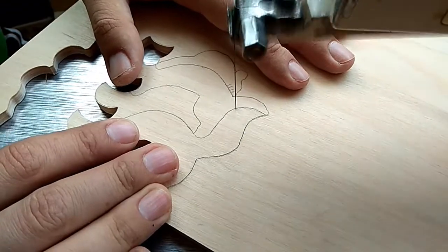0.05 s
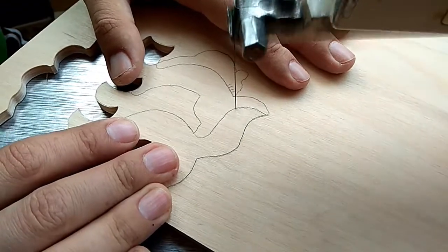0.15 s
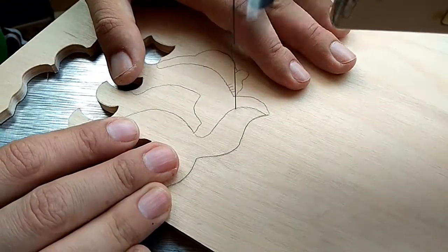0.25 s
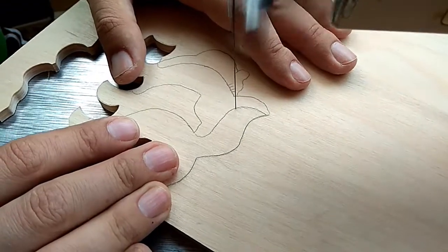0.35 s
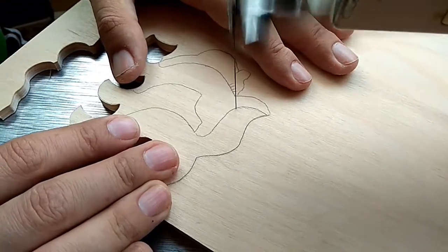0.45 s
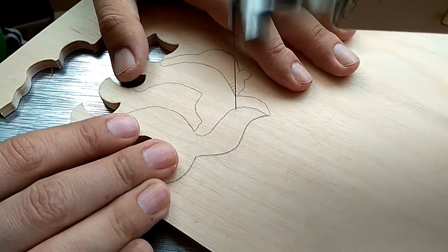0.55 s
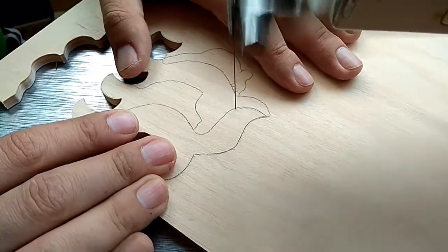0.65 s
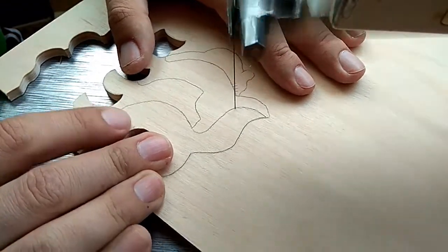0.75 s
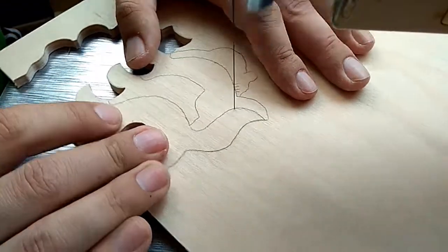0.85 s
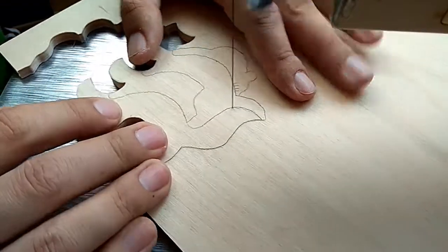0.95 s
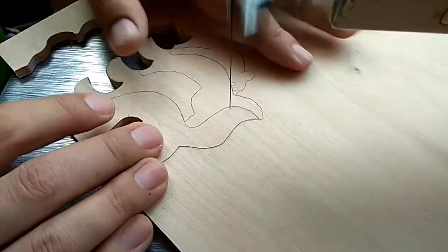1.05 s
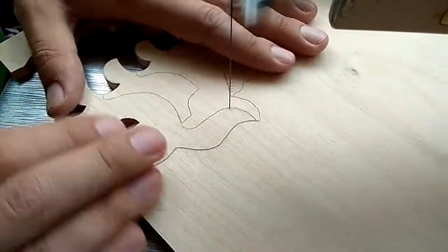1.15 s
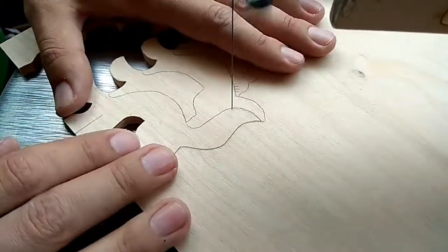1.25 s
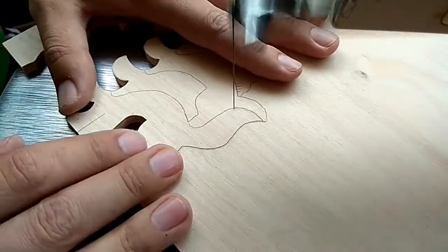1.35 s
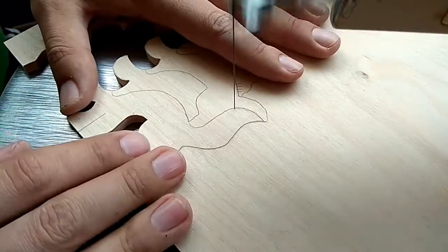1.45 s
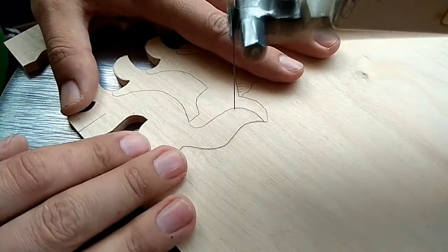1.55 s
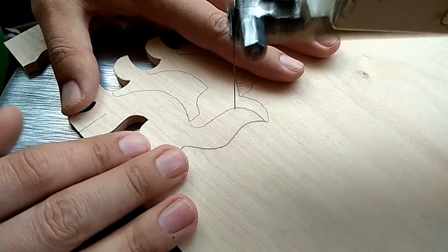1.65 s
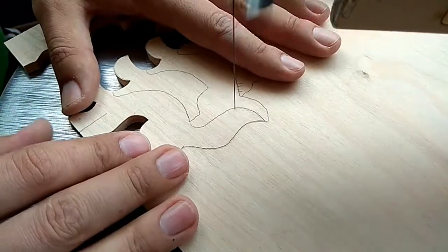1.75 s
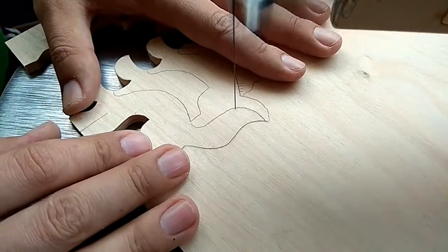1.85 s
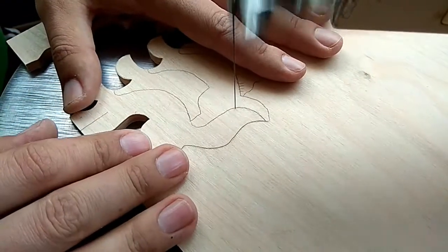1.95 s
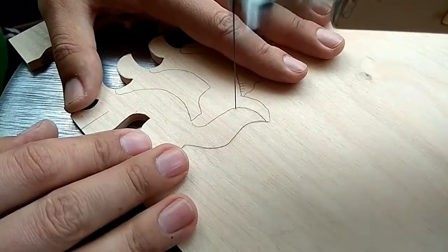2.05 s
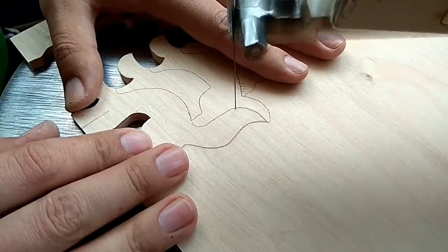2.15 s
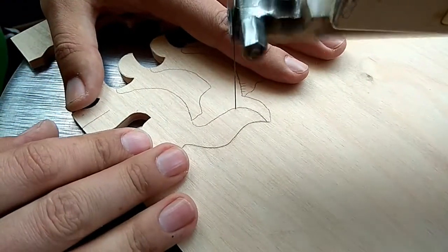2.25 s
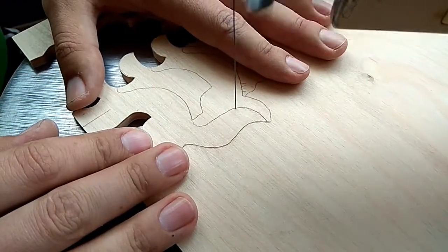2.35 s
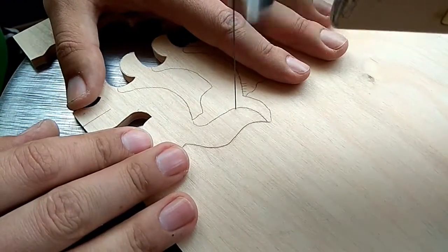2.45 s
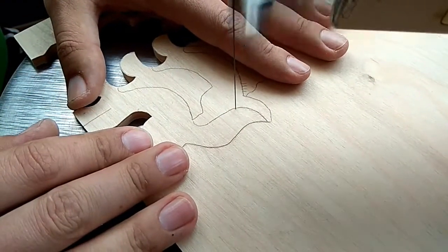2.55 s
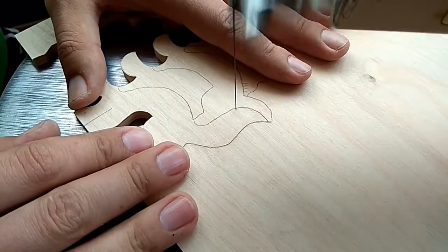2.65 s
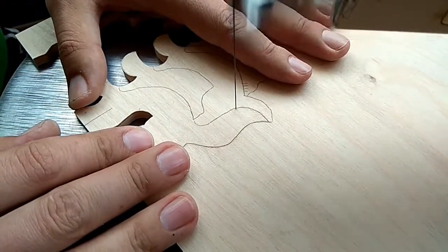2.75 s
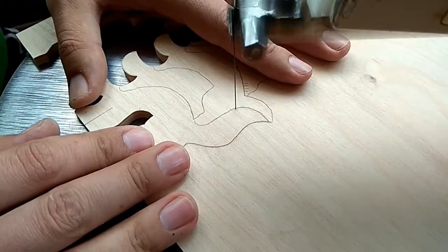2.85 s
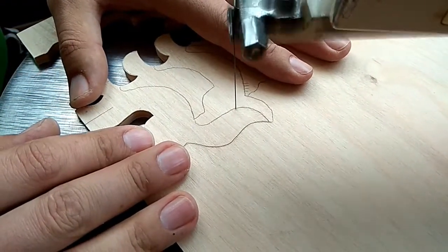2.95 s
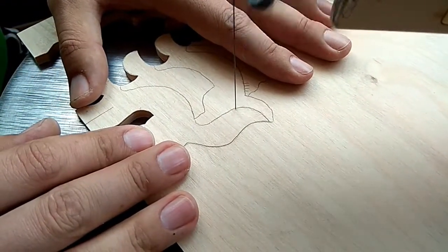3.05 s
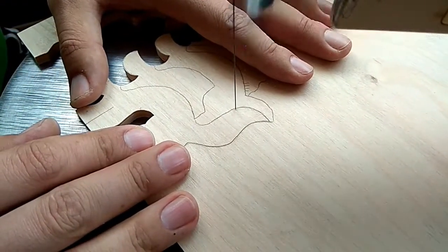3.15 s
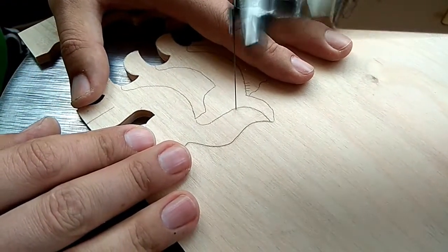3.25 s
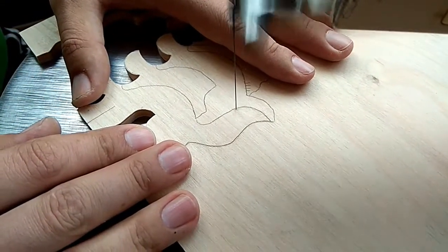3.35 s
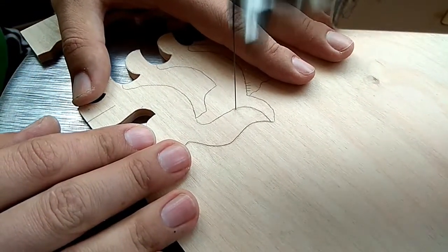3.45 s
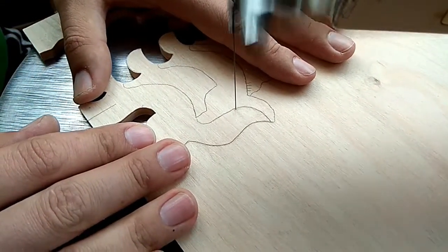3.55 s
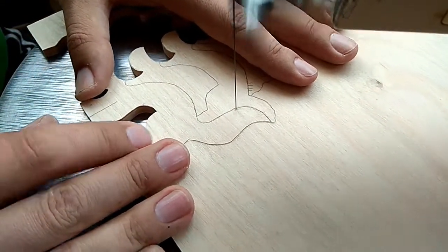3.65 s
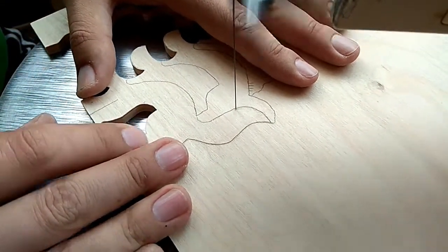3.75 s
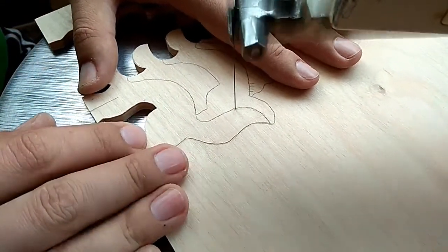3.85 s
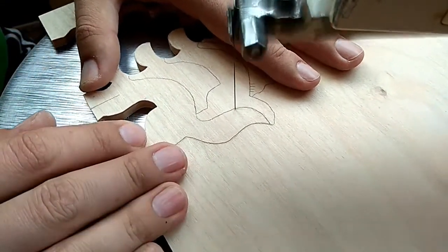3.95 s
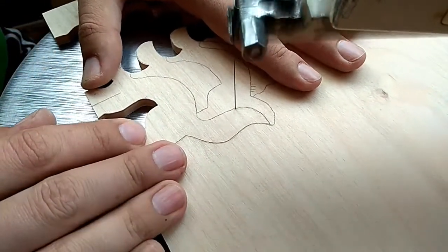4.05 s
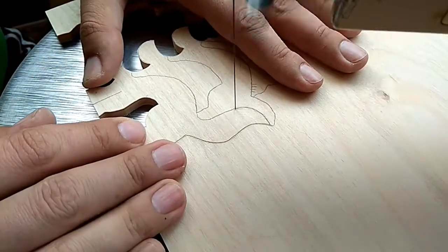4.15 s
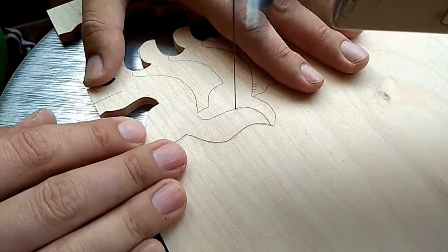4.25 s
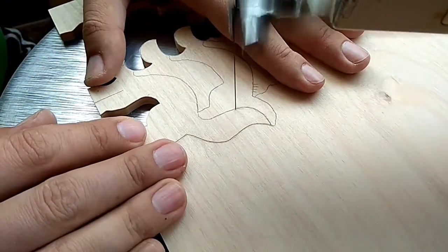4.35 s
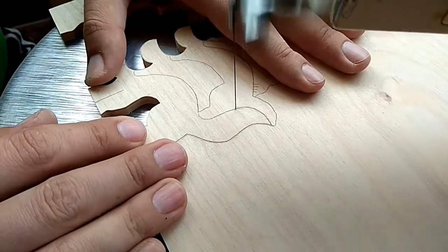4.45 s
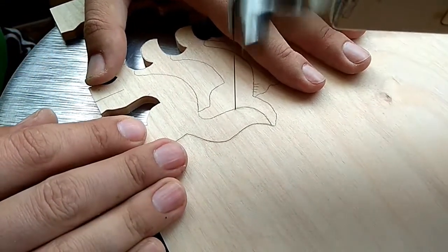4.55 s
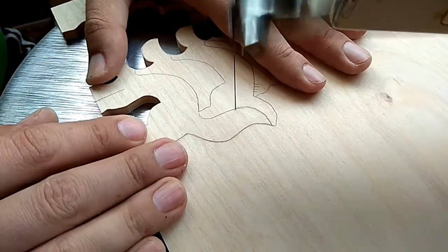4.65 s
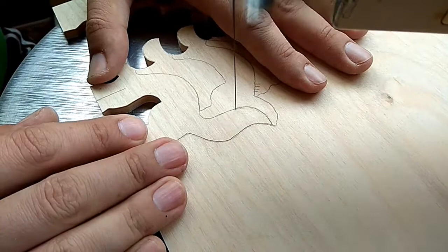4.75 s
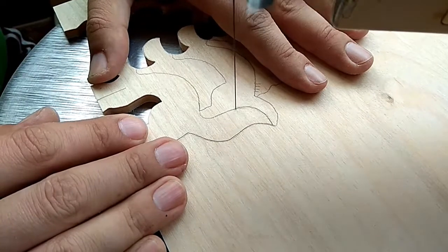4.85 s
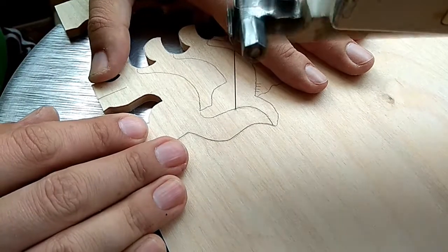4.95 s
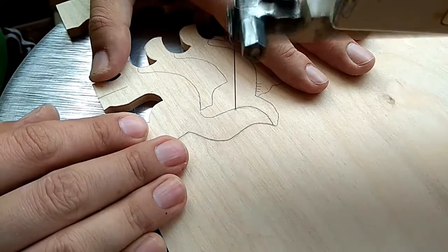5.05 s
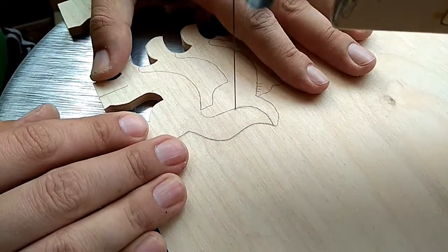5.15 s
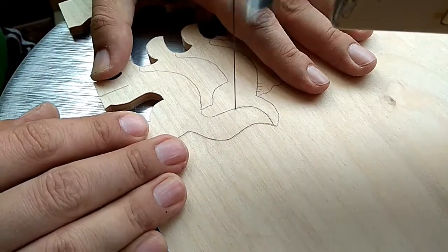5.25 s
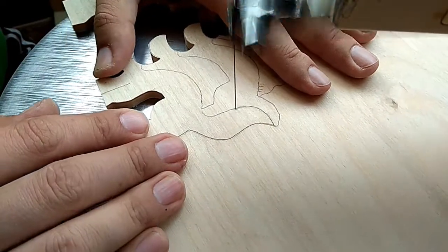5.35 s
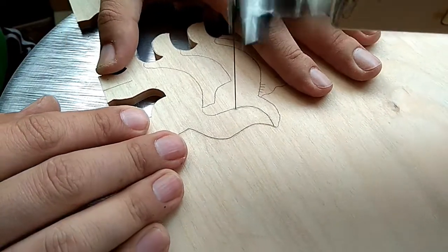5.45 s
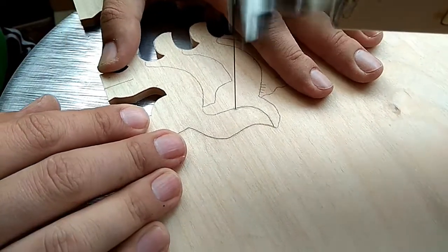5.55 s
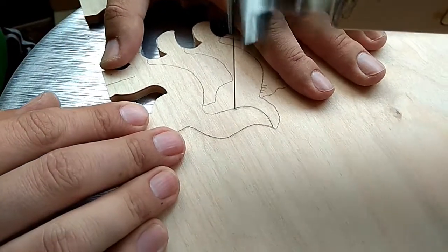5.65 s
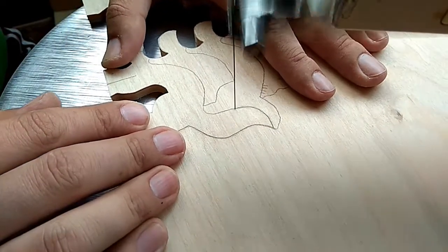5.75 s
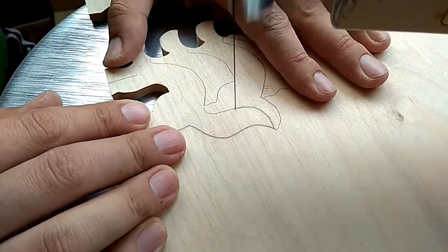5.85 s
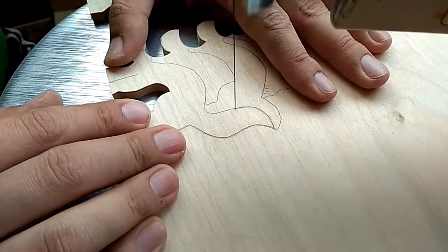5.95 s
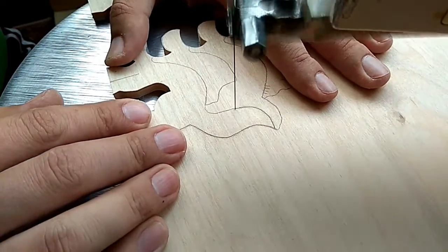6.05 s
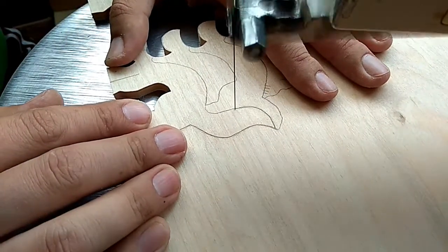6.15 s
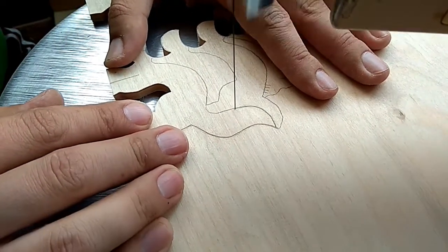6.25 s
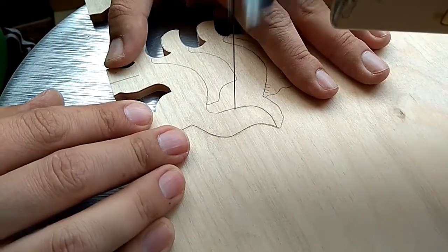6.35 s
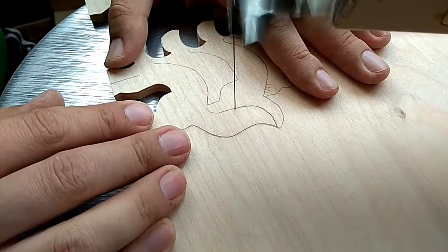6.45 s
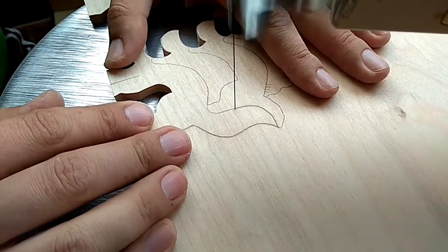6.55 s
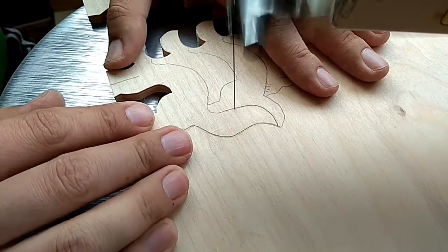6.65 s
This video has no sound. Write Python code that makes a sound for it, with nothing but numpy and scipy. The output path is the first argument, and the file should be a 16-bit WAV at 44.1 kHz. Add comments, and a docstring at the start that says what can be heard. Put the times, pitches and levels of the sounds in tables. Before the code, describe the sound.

Close, rattling scroll saw cutting a thin board: rapid woody knocks, gritty tooth rasp and low motor hum, with one short early lull.

```python
"""In a workshop a scroll saw cuts thin plywood, close to two microphones, over motor rumble and hum.
A crank drives the blade up and down about 23 times a second. On each downstroke the teeth catch with a knock,
rattle as clicks whose rate arches with blade speed, and ring the board; coloured noise rubs both ways.
Early on the feed eases off for a moment, the motor runs faster, and the blade sings out a few times."""
import sys
import numpy as np
from scipy import signal
from scipy.fft import rfft, irfft
from scipy.io import wavfile
from scipy.ndimage import uniform_filter1d

SR = 44100
rng = np.random.default_rng(int(sys.argv[2]) if len(sys.argv) > 2 else 0)


def voltage_ratio(level):
    """Linear amplitude factor for a level in decibels (scalar or array-like)."""
    return 10 ** (np.asarray(level, float) / 20)


def waveform_to_disk(signal):
    """Save audio, clipped to [-1, 1], as 16-bit WAV at the path in sys.argv[1]."""
    frames = np.transpose(np.atleast_2d(signal))
    scaled = np.clip(frames, -1, 1) * 32767
    samples = np.round(scaled).astype(np.int16)
    wavfile.write(sys.argv[1], SR, samples)


N = 295470


def evened(x):
    """Scales to rms 1."""
    return x / np.sqrt(np.mean(x ** 2) + 1e-20)


def read(points, hz):
    """Interpolates a spectrum on a log-frequency axis."""
    f, value = np.transpose(points)
    return np.interp(np.log(hz + 1), np.log(f + 1), value)


def curves(rows):
    """Columns of a timed table, one value a sample."""
    s, *columns = np.transpose(rows)
    return [np.interp(np.arange(N) / SR, s, c) for c in columns]


def mode(x, hz, width_hz):
    """One-pole complex resonance, about unit gain at its centre, along the last axis."""
    r = np.exp(-np.pi * width_hz / SR)
    pole = r * np.exp(2j * np.pi * hz / SR)
    return 2 * signal.lfilter([1 - r], [1, -pole], x).real


def drift(size):
    """Smoothed noise of rms 1; size in samples."""
    return evened(uniform_filter1d(rng.standard_normal(N), size=size))


def noise(spectrum_db, size, patchy_db):
    """Two unrelated noises of joint rms 1, coloured by spectrum_db(Hz, s) and shared drifting patches."""
    hz, frames = np.fft.rfftfreq(size, 1 / SR), 4 * N // size + 5
    a, b, patches = rng.standard_normal((frames, len(hz), 2, 3)).T
    patches = uniform_filter1d(patches[0], size=6, axis=0)
    patches = evened(uniform_filter1d(patches, size=30, axis=1))
    frame_s = np.arange(frames) * size / 4 / SR
    z = (a + 1j * b) * voltage_ratio(spectrum_db(hz[:, None], frame_s) + patchy_db * patches)
    return evened(signal.istft(z, nperseg=size, noverlap=3 * size // 4)[1][:, :N])


# motor: t/s, relative rumble level/dB, relative hum level/dB
MOTOR_LEVELS = [(0, -43.5, -37), (0.4, -48.5, -43.5), (0.75, -57, -49), (1, -50, -42), (1.35, -46.5, -43.5),
                (1.68, -57, -54), (1.95, -47, -53), (2.15, -45.5, -51.5), (2.4, -51.5, -43),
                (3.0, -45, -44.5), (3.4, -43, -44), (3.6, -45.5, -43), (4.3, -44, -43), (4.55, -48.5, -45),
                (5, -44.5, -42), (5.8, -44.5, -45), (6.4, -41.5, -47), (6.7, -44.5, -39)]
# rumble spectrum: f/Hz, relative level/dB
RUMBLE_SPECTRUM = [(12, -34), (20, -0.5), (107, -6), (150, -3), (268, -8), (300, -4.5), (390, -92),
                   (660, -120)]
HUM_HZ = 300


def motor():
    """Lumpy low noise, unlike at the two microphones, plus a shared sine hum with a narrowband waver."""
    rumble_db, hum_db = curves(MOTOR_LEVELS)
    rumble = noise(lambda hz, s: read(RUMBLE_SPECTRUM, hz) + 0 * s, size=2048, patchy_db=1.0)
    dips_db = 6.0 - 3.0 * np.minimum(drift(3500) ** 2, 5)  # level wavers at random, with brief deep dips
    rumble = rumble * voltage_ratio(rumble_db + 5.0) * voltage_ratio(dips_db)
    waver = evened(mode(rng.standard_normal(N), HUM_HZ, 8.6))
    hum = np.sin(2 * np.pi * HUM_HZ * np.arange(N) / SR) + .9 * waver
    return rumble + voltage_ratio(hum_db - 2.5) * hum


# blade rings: t/s, peak level before the saw's filters/dB, f/Hz
CLINK_ROWS = [(0.2199, -8, 6120), (0.2684, -20, 6030), (0.3127, -12, 6250), (0.3341, -17, 6080),
              (0.354, -7, 6110), (0.3945, -12, 6070), (0.4, -14, 6260)]
CLINK_S = 0.0012  # onset to envelope peak


def clinks():
    """Short sine rings of the taut blade near 6 kHz, each with a rise-and-decay envelope."""
    t, out = np.arange(N) / SR, np.zeros(N)
    for s, db, hz in CLINK_ROWS:
        u = np.maximum(t - s, 0) / CLINK_S
        out += voltage_ratio(db) * u * np.exp(1 - u) * np.sin(2 * np.pi * hz * t)
    return out


# crank: t/s, turns completed/turns; faster while the feed eases off
CRANK_TURNS = [(-.0015, 0), (.4349, 10), (.9791, 23), (1.2797, 30), (2.1888, 51), (2.9711, 69),
               (3.3677, 78), (3.8908, 90), (5.2068, 120), (5.9946, 138), (6.3867, 147), (6.7372, 155)]


def crank():
    """Crank turns since the first catch."""
    return np.interp(np.arange(N) / SR, *np.transpose(CRANK_TURNS))


# rubbing spectra, early and late colour: f/Hz, relative level/dB
EARLY_RUB = [(180, -83), (300, -24), (420, -13.5), (563, -21.5), (738, 3.5), (883, -22), (1140, -11.5),
             (1930, -2.5), (2450, -7), (3900, -10.5), (4530, -15.5), (5420, -4), (6200, 1), (7310, -2.5),
             (9440, -25.5), (10800, -32.5), (14000, -120), (22000, -120)]
LATE_RUB = [(180, -72), (300, -21.5), (547, -12.5), (749, -6), (883, -6), (1280, -2), (1900, -10.5),
            (2310, -11.5), (3070, -12), (3950, -11.5), (4330, -5), (6580, -26), (7200, -24), (10000, -5),
            (10800, -4), (14000, -100), (22000, -120)]
# modes the rubbing rings: f/Hz, width/Hz, level re rubbing/dB
RUB_MODES = [(3030, 94, -1), (3507, 54, -1), (3900, 110, -7.5), (6210, 71, -4)]
# hollow as the work is turned: t/s, centre f/Hz, gain/dB, share of the late rubbing colour/0-1
WORK_HOLLOW = [(0, 5400, -8, 0.35), (.6, 4920, -12, 0.5), (2, 4710, -14, 0.49), (3.2, 4920, -5, 0.51),
               (3.7, 4750, 2, 0.55), (5.8, 4330, -3, 0.7), (6.7, 4630, -7, 0.67)]
LULL_TURN, LULL_SPAN_TURN, LULL_DB, LULL_HZ = 0.73, 0.093, -4, 1530
HEAVE_TURN, HEAVE_SPAN_TURN, HEAVE_DB, HEAVE_HZ = 0.37, .12, 7, 590


def rubbing(part, speed, clicks, rub_db, low_db):
    """Noise that swells with blade speed, is puffed by the teeth and rings the frame and work."""
    late_share = curves(WORK_HOLLOW)[2]

    def colour_db(hz, s):
        """Blends the two colours and shifts the part under about 2.3 kHz."""
        low = np.interp(s * SR, np.arange(N), low_db) - 3.0
        share = np.interp(s * SR, np.arange(N), late_share)
        blend = (1 - share) * read(EARLY_RUB, hz) + share * read(LATE_RUB, hz)
        return blend + low / (1 + (hz / 2300) ** 6)

    swell = 0.57 + (0.58 + 0.03 * np.sign(speed)) * abs(speed) ** 0.34
    hiss = voltage_ratio(rub_db + 4.5) * swell * noise(colour_db, size=512, patchy_db=2.5)
    hiss = hiss * (0.77 + 0.1 * uniform_filter1d(clicks, size=9) * 9 / 4)  # each tooth tears a puff of fibres
    hiss = hiss + voltage_ratio(4) * mode(hiss, 390, 13.5) + voltage_ratio(-1) * mode(hiss, 495, 18.7)  # the frame hums along
    hiss = hiss + sum(voltage_ratio(db) * mode(hiss, hz, width_hz) for hz, width_hz, db in RUB_MODES)
    # lull: mid upstroke, board hardly driven; heave: late downstroke, table pushed down and thuds
    for turn, span, db, hz in ((LULL_TURN, LULL_SPAN_TURN, LULL_DB, LULL_HZ),
                               (HEAVE_TURN, HEAVE_SPAN_TURN, HEAVE_DB, HEAVE_HZ)):
        low = signal.sosfiltfilt(signal.butter(3, hz, fs=SR, output="sos"), hiss)
        hiss = hiss + low * (voltage_ratio(db * np.exp(-((part - turn) / span) ** 2)) - 1)
    return hiss


TOP_TEETH_HZ = 1991.4  # mean tooth rate at full blade speed


def teeth(speed, jitter_teeth, uneven_db):
    """One click per passing tooth, sized separately for two paths; grain makes spacing and size uneven."""
    slip = .4 * drift(1500)  # teeth, slow
    passed = np.floor(np.cumsum(TOP_TEETH_HZ * abs(speed)) / SR + jitter_teeth * drift(40) + slip)
    clicks = np.diff(np.maximum.accumulate(passed), prepend=0) > 0
    size = np.clip(rng.standard_normal((N, 2)).T, -2, 1.5)
    return evened(clicks * voltage_ratio(uneven_db * size))


# board and table response to a tooth blow: f/Hz, gain/dB
BOARD_GAIN = [(100, -29), (350, -39), (600, -20), (1000, 8), (2000, 0), (2500, -16), (3800, -2.5),
              (4300, -16), (4750, -7.5), (5300, 0.5), (6000, -0.5), (11000, -37)]
# narrow modes of board and frame: f/Hz, width/Hz, level re plain response/dB
BOARD_MODES = [(670, 117, 19), (963, 9.8, 19), (1045.6, 16, 15.5), (1431, 17, 11.5), (1607, 65, 8.5),
               (2070, 44, 17.5), (1272.4, 30, 13), (1500, 11, 16), (1891, 81, 12.5), (3175, 86, 17),
               (3580, 47, 4.5), (3877, 29, 16.5)]


def radiate(x, size=4096):
    """Causal minimum-phase colour of the board, plus its narrow modes, weaker on the second path."""
    log_gain = np.log(voltage_ratio(read(BOARD_GAIN, abs(np.fft.fftfreq(size, 1 / SR)))))
    taps = np.fft.ifft(np.exp(np.conj(signal.hilbert(log_gain)))).real[:size // 2]
    plain = signal.oaconvolve(x, taps[None], axes=1)[:, :N]
    rings = sum(voltage_ratio(db) * mode(plain, hz, width_hz) * [[1], [.6]] for hz, width_hz, db in BOARD_MODES)
    return plain + rings


# lower hollow, moving as hands and work shift: t/s, centre f/Hz, gain/dB
HANDS_HOLLOW = [(0, 2370, -2), (.5, 2340, -4), (.64, 2350, -1), (.7, 1320, -14), (.78, 1460, -19),
                (.84, 1400, -23), (.9, 1150, -7), (.95, 1350, -18), (1.03, 1370, -1), (1.1, 2640, -4.5),
                (3.3, 2430, 2), (3.6, 2420, -6.5), (4.85, 2350, -1.5), (5.05, 2700, -3), (5.4, 2590, -7),
                (5.6, 2890, -9), (6.7, 2700, -1.5)]


def hollowed(x, size=512):
    """Two drifting Gaussian hollows in the spectrum of the whole saw."""
    hz, s, z = signal.stft(x, SR, nperseg=size, noverlap=3 * size // 4)
    at = np.minimum(s * SR, N - 1).astype(int)
    for rows, width_hz in ((WORK_HOLLOW, 330), (HANDS_HOLLOW, 170)):
        centre_hz, gain_db = (c[at] for c in curves(rows)[:2])
        z = z * voltage_ratio(gain_db * np.exp(-((hz[:, None] - centre_hz) / width_hz) ** 2))
    return signal.istft(z, SR, nperseg=size, noverlap=3 * size // 4)[1][:, :N]


# clearest catches: t/s, relative knock level/dB, relative board ring level/dB, cut level re feed/dB
HARD_CATCHES = [(.22, -11, -23.5, -15), (.395, -16, -27, 5), (.565, -19, -34, 5.5), (.693, -27, -38.5, 9),
                (.77, -32, -54, 5), (.814, -27, -41, -6), (.858, -31, -45, -5), (.94, -28, -45, 7),
                (1.454, -7, -23, 2), (1.496, -9, -20, 1), (1.67, -11, -27, 3.5), (1.756, -1, -25, 4.5),
                (1.886, 1, -28, 0.5), (2.016, -17, -20, 1), (2.059, -3, -22.5, -1), (2.233, -8, -24, 1),
                (2.32, -5, -20.5, 2), (2.364, -11, -21, 4), (2.493, -12, -29, 3), (2.623, -3, -25, 3),
                (2.883, -6, -27.5, 0), (2.928, -8, -23.5, 2), (3.016, -7, -21, 0.5), (3.059, -4, -28, -1),
                (3.103, -4, -19.5, -7), (3.147, -4, -20.5, 2.5), (3.191, -11, -22.5, 2),
                (3.324, -7, -21.5, -0.5), (3.368, -4, -20, -3), (3.412, -1, -23.5, -0.5),
                (3.456, -6, -25.5, -3), (3.499, -1.5, -31, -1), (3.543, -5, -35, -4), (3.586, -7, -38, 4),
                (3.803, -10, -21.5, -1), (3.892, -3, -22.5, -3), (3.935, -3.5, -22, 1),
                (4.023, -1, -19, -1), (4.11, -3, -29, -4), (4.155, -12, -24.5, 0), (4.461, -1, -16.5, -1),
                (4.768, -3, -24.5, -2), (4.9, -12, -40, 1.5), (4.987, -15, -25, 2), (5.031, -3, -17.5, 0.5),
                (5.075, -7, -21.5, 3), (5.119, -9, -32, -3), (5.163, -5.5, -20.5, 2.5),
                (5.207, -4, -20, -3), (5.25, -12, -23, 1), (5.294, -9, -18, 0.5), (5.338, -14, -18.5, 0),
                (5.382, -7, -21.5, -1), (5.426, -14, -29, 3), (5.47, -8, -19, -3), (5.513, -5, -23, 1.5),
                (5.557, -5, -20.5, -3.5), (5.601, -8, -20.5, 1), (5.645, -7, -19, 4),
                (5.688, -2, -23, -0.5), (5.775, -4, -22, 0), (5.906, -7, -17, 0), (5.995, -1.5, -19, -2),
                (6.038, -7, -29, 0), (6.125, -7, -22.5, 3.5), (6.299, -8, -29, 3), (6.343, -5, -17.5, 3),
                (6.474, -6, -28, 2)]
CATCH_DB, SLACK_DB = 14.5, 3.5  # knock setting over cut setting; mean shortfall
GRAIN_DB, RING_SPREAD_DB, RING_SHIFT_HZ = 1.6, 2, 11  # stroke-to-stroke scatter, one sigma
LIGHT_FEED_DB, EASING = -18, 0.66  # below this cut setting teeth barely bite: dB lost per dB


def strokes(turns, cut_db, ring_db):
    """Cut/dB, knock/dB, ring/dB and ring shift/Hz per stroke, from feed, chance and the hard catches."""
    at = np.minimum(np.searchsorted(turns, np.arange(int(turns[-1]) + 1) + 0.39), N - 1)
    grain, luck, slack, grip = rng.standard_normal((len(at), 4)).T
    bite = cut_db[at] + EASING * np.minimum(cut_db[at] - LIGHT_FEED_DB, 0)
    cut = bite + GRAIN_DB * grain
    knock = bite + CATCH_DB - SLACK_DB * slack ** 2
    ring = ring_db[at] + RING_SPREAD_DB * luck
    s, hard_db, hard_ring_db, hard_cut_db = np.transpose(HARD_CATCHES)
    which = np.round(turns[(s * SR).astype(int)] - .1).astype(int)
    knock[which], ring[which], cut[which] = hard_db, hard_ring_db, bite[which] + hard_cut_db
    return np.array([cut, knock, ring, RING_SHIFT_HZ * grip])[:, turns.astype(int)]


def catch(since_s, catch_db, grit):
    """Slack is taken up in a short burst of tone and noise through two broad modes."""
    burst = (1 - np.exp(-since_s / 0.0014)) * np.exp(-since_s / 0.00072)
    blow = burst * (np.sin(2 * np.pi * 1200 * since_s) + 0.66 * grit)
    return voltage_ratio(catch_db + 10.5) * mode(mode(blow, 1270, 1830), 1260, 1960)


RING_HZ, RING_WIDTH_HZ = 752, 40  # strongest board mode, before the stroke's shift


def board_ring(part, since_s, biting, clicks, grit, ring_db, shift_hz):
    """Catch and biting teeth drive the strongest board mode; the grip shifts it from stroke to stroke."""
    push = np.exp(-since_s / 0.0019) * np.sin(2 * np.pi * RING_HZ * since_s) + 0.5 * biting * grit
    push = push + 2.5 * (part > .2) * biting * clicks  # slowing teeth pass through the mode again
    ring = evened(mode(mode(push, RING_HZ, 1400), RING_HZ, RING_WIDTH_HZ))
    ring = (signal.hilbert(ring) * np.exp(2j * np.pi * shift_hz * since_s)).real
    ring = ring * uniform_filter1d(voltage_ratio(ring_db - 1.0), size=30, origin=14)
    return ring * voltage_ratio(-200 * np.maximum(since_s - .02, 0))  # hands damp the board once the cut lets go


# feed: t/s, relative rubbing level/dB, rubbing under 2.3 kHz re rubbing/dB, relative cut level/dB,
# relative board ring level/dB
FEED_LEVELS = [(0, -20.5, -1, -22, -23), (0.2, -23.5, 8, -20.5, -34.5), (0.42, -23, 2.5, -25.5, -29),
               (0.55, -25.5, -5.5, -27, -49), (0.65, -30, -2, -31.5, -53), (0.74, -42.5, 6, -34, -51),
               (0.78, -30, -3, -29.5, -49), (0.87, -33.5, -2, -35, -49), (1.0, -24.5, -8.5, -30, -62),
               (1.1, -21.5, 1.5, -24, -35), (1.25, -21, 0, -20, -30), (1.5, -22.5, 3.5, -20.5, -22.5),
               (2.3, -22.5, 5, -19.5, -27), (2.85, -23.0, 4.5, -19.5, -25.5), (3.4, -23.5, 5, -20.5, -25),
               (3.65, -23, 1, -22, -35), (3.9, -23, 4.5, -20, -30), (4.7, -23, 2.5, -20.5, -24.5),
               (5.8, -22, 1.5, -21.5, -27.5), (6.7, -22.5, 1.6, -21, -22.5)]
CATCH_TURN = .082  # top of stroke to catch
RETURN_LAG_TURN = .06  # play in the arm delays the upstroke
BASS_CUT_HZ = 284  # a small thin board radiates little bass


def saw():
    """Catch, cut and ring on the downstroke; lighter teeth and rubbing both ways. Returns two paths."""
    turns = crank()
    part = turns % 1
    lag_turn = np.array([[0], [RETURN_LAG_TURN]])
    down, up = np.sin(2 * np.pi * (part + CATCH_TURN - lag_turn))
    speed = np.maximum(down, 0) + np.minimum(up, 0)  # positive going down
    rub_db, low_db, *feed = curves(FEED_LEVELS)
    cut_db, catch_db, ring_db, shift_hz = strokes(turns, *feed)
    since_s = part * 0.0411  # since the catch, counting 41.1 ms a turn
    biting = (part < .5 - CATCH_TURN) * np.exp(-since_s / 0.022) * abs(speed) ** 0.05
    clicks = teeth(speed, jitter_teeth=.06, uneven_db=1.8)
    bite = evened(biting * (1 + .9 * np.exp(-since_s / .004)))  # first teeth bite deepest
    cut = voltage_ratio(cut_db - 3.8) * bite * clicks
    drag = voltage_ratio(rub_db - 21.0) * abs(speed) ** 0.33 * clicks
    grit = rng.standard_normal((N, 2)).T
    knock = catch(since_s, catch_db, grit)
    ring = board_ring(part, since_s, biting, clicks, grit, ring_db, shift_hz)
    hiss = rubbing(part, speed, clicks, rub_db, low_db)
    whole = hollowed(radiate(cut + drag) + knock + ring + hiss + clinks())
    return signal.sosfilt(signal.butter(3, BASS_CUT_HZ, "high", fs=SR, output="sos"), whole)


# stereo width of the saw: f/Hz, unshared path gain/dB
UNSHARED_GAIN = [(60, 5), (270, -2), (750, -12.5), (1200, -4), (1700, 2), (1950, -3.5), (2500, 0),
                 (4400, -3), (6500, -4.5), (8000, -3.5), (10800, 0.5)]
# stereo balance of the saw: f/Hz, left minus right/dB
LEFT_LEAN = [(60, 11), (500, -3), (1000, -4), (1400, -0.5), (1850, -6.5), (2300, -0.5), (3000, 4.5),
             (3900, 0.5), (5500, -1.5), (8300, -1.5), (9400, 1.5), (10800, 0)]
# reflections: f/Hz, phase between left and right/rad
PHASE_TURN = [(60, 0.73), (2100, 0.69), (2400, 4.44), (3000, 2.36), (3400, 9.6), (3800, 5.6), (4400, 3.35),
              (5600, 8.25), (6800, 6.6), (7300, 10.4), (8000, 0.071), (10000, 11.44)]


def scene():
    """Saw's shared and unshared paths spread to left and right by spectrum, plus the motor."""
    hz = np.fft.rfftfreq(N, 1 / SR)
    shared, unshared = rfft(saw())
    unshared = unshared * voltage_ratio(read(UNSHARED_GAIN, hz))
    lean = voltage_ratio(read(LEFT_LEAN, hz) / 2) * np.exp(.5j * read(PHASE_TURN, hz))
    left, right = (shared + unshared) * lean, (shared - unshared) / lean
    return irfft(np.array([left, right]), N) + motor()


def top_cut(x):
    """Nothing passes above the cut-off."""
    return signal.sosfilt(signal.butter(12, 10860, fs=SR, output="sos"), x)


def record(dry):
    """Peaks round off in the recorder by tanh saturation."""
    ceiling = 1.1
    mix = ceiling * np.tanh(dry / ceiling)
    return top_cut(mix)


dry = scene()
out = record(dry)
waveform_to_disk(out)
```